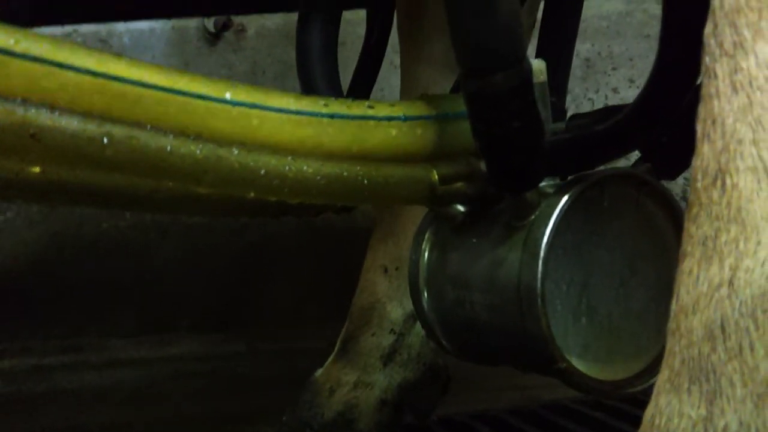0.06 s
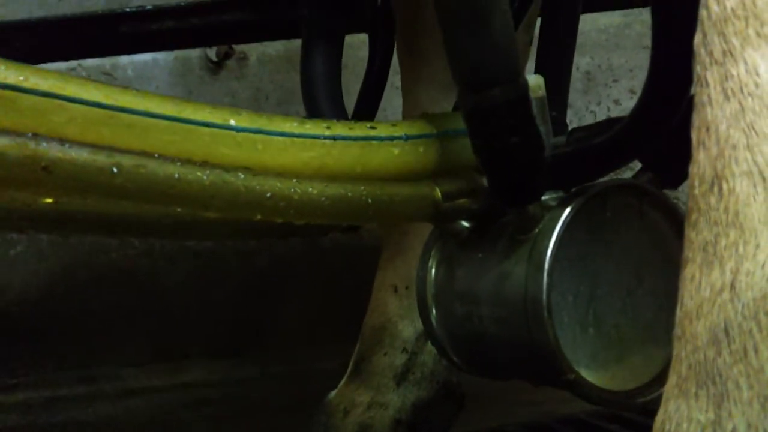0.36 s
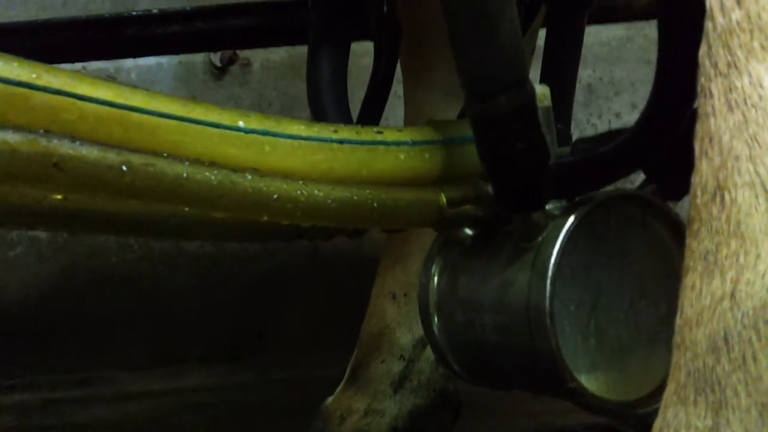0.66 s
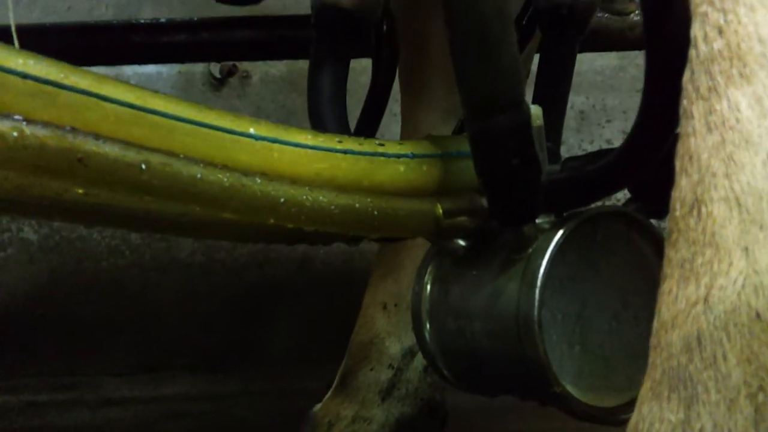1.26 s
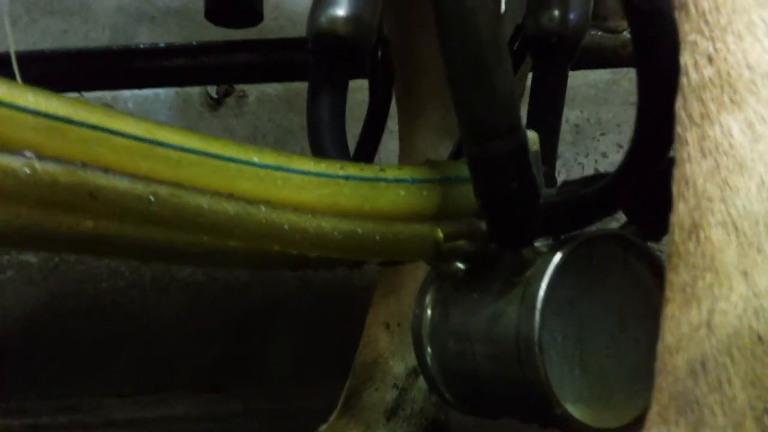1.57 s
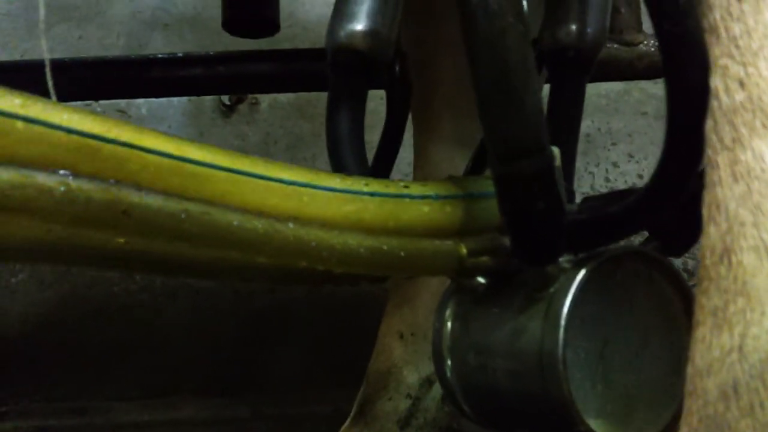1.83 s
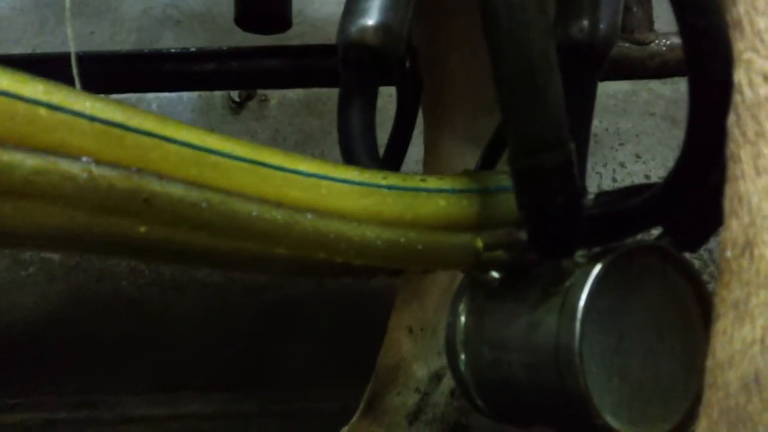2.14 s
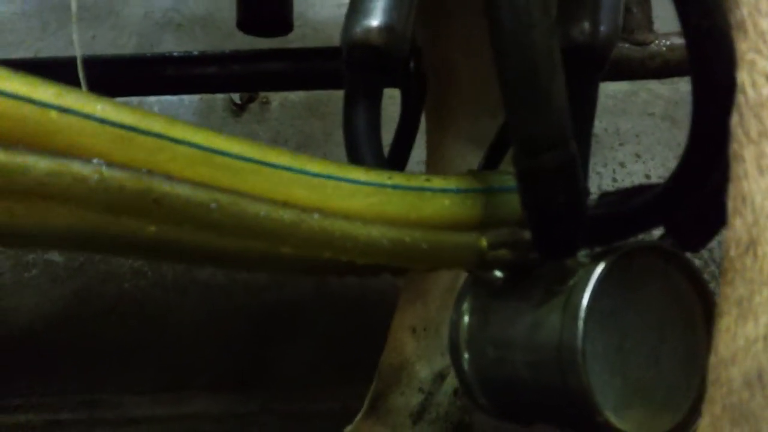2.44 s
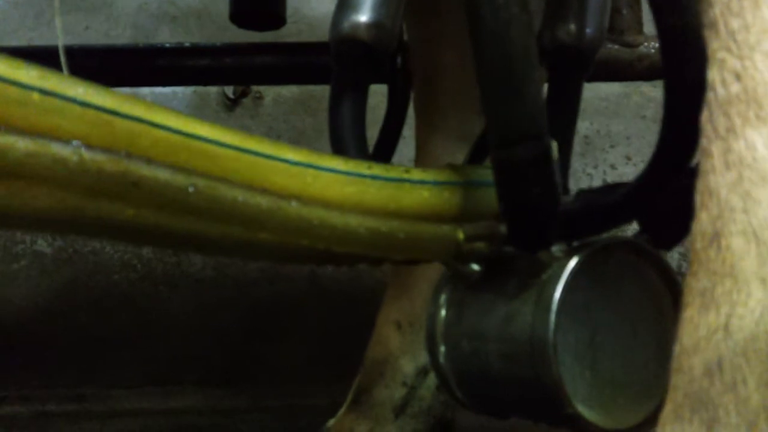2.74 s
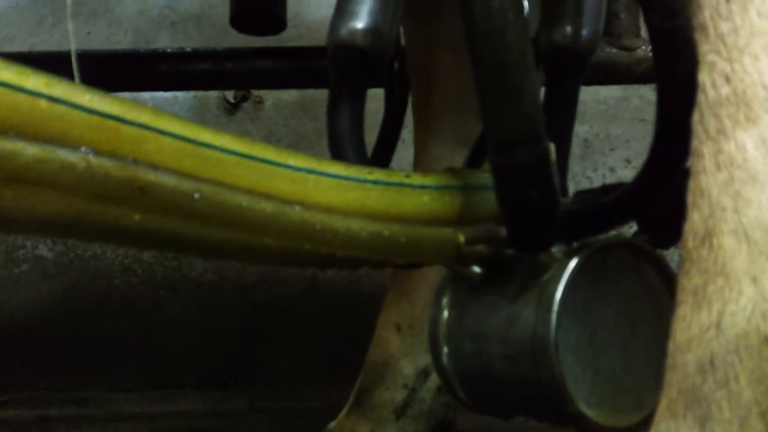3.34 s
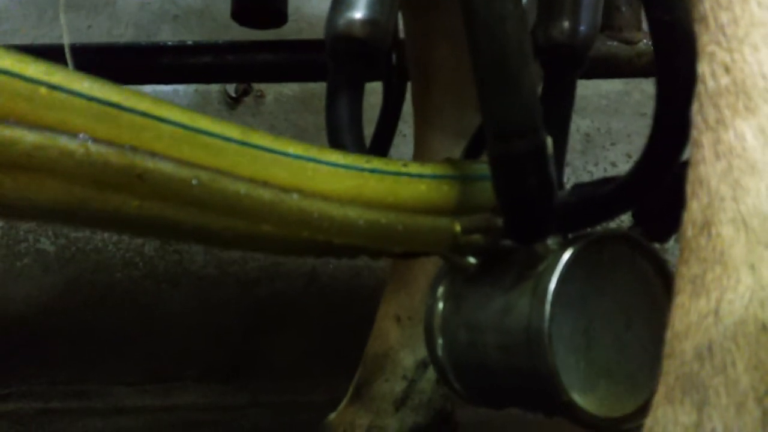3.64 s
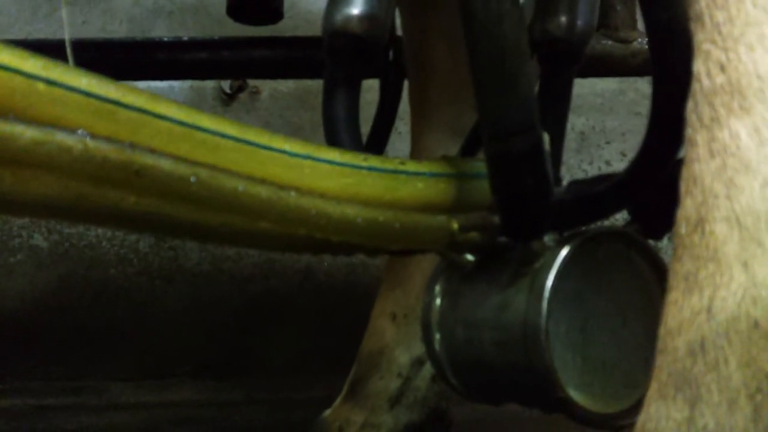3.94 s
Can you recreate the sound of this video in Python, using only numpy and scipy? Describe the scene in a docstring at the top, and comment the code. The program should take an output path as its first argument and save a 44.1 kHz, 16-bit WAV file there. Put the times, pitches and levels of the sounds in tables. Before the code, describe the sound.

A milking machine hisses unevenly and puffs twice a second over a low rumble.

```python
"""Milking a cow, up close

Air and milk hiss through the claw, the steel piece that joins the teat cups, in uneven
surges that set it and its milk tube ringing. The pulsator, an air valve, puffs about twice
a second and the hoses throb after it. Milk gurgles in the lines now and then, while the
vacuum pump drones over the steady rumble of the milking parlour."""
import sys
import numpy as np
from scipy import signal
from scipy.fft import irfft
from scipy.io import wavfile

SR = 44100
rng = np.random.default_rng(int(sys.argv[2]) if len(sys.argv) > 2 else 0)


def digitize_waveform(pressure):
    """Quantize a signal to 16-bit integers and store it at the path in sys.argv[1].

    Rows of a 2-D input are taken as channels; values are limited to [-1, 1].
    """
    field = np.atleast_2d(pressure).T
    bounded = np.clip(field, -1, 1)
    quanta = np.round(bounded * 32767).astype(np.int16)
    wavfile.write(sys.argv[1], SR, quanta)


N = 176400  # 4 seconds

# Flow through the claw. Each row: time in seconds, relative level in dB.
CLAW_FLOW = [(0.0, -31), (0.23, -34.5), (0.39, -29.5), (0.53, -34), (0.69, -28.5), (0.98, -29),
             (1.11, -26.5), (1.25, -30), (1.32, -25.5), (1.35, -29), (1.39, -23), (1.46, -27.5),
             (1.56, -28), (1.58, -20.5), (1.67, -27.5), (1.76, -28), (1.8, -23), (1.85, -27.5), (1.97, -24),
             (2.32, -29), (2.39, -19.5), (2.62, -26.5), (2.65, -22.5), (2.92, -25.5), (2.97, -24),
             (3.1, -27.5), (3.16, -25.5), (3.23, -27), (3.24, -25), (3.45, -22.5), (3.46, -22),
             (3.63, -24.5), (3.7, -21), (3.88, -28.5), (4.0, -24)]
# Tone of its high hiss. Each row: frequency in Hz, relative level in dB.
HISS_TONE = [(1000, -44.5), (2500, -14), (3500, -9), (4400, -3.5), (5250, 0), (6100, -3.5), (7000, -10),
             (7700, -13.5), (8300, -23), (9000, -47.5)]
# A lower rush under the hiss. Each row: time in seconds, relative level in dB.
RUSH_LEVELS = [(0.0, -36.5), (0.12, -38), (0.39, -32), (0.58, -36), (0.91, -30), (1.1, -34), (1.4, -29),
               (1.94, -28.5), (2.33, -29.5), (2.44, -28.5), (2.57, -30.5), (3.72, -29), (3.89, -32),
               (4.0, -33)]
# Tone of that rush. Each row: frequency in Hz, relative level in dB.
RUSH_TONE = [(300, -1.5), (700, -8), (1200, -6), (1600, 0.5), (1950, -1.5), (2250, 0), (2550, -2),
             (3200, 1.5), (4500, -4.5), (8000, -25)]
# Ringing notes of the claw and its milk tube. Each row: pitch in Hz, relative level in dB.
CLAW_NOTES = [(1572, -49), (2439, -44), (2498, -49), (2724, -46), (3031, -48), (3354, -46), (3537, -49),
              (3957, -42), (4323, -40), (4436, -42), (4527, -44), (4710, -42), (4791, -39), (4840, -37),
              (5044, -38), (5254, -34), (5292, -37), (5609, -37), (5696, -38), (6083, -43), (6573, -41),
              (6745, -50)]
TUBE_NOTES = [(1630, -14), (2235, -11), (3550, -6), (4315, -3), (4436, -6), (4700, -6), (4835, -4),
              (5265, -4), (5610, 0), (6085, -4), (6573, -9), (7085, -9), (7600, -12), (7870, -16),
              (8130, -19), (8400, -23)]
# Surges of air. Each row: start and hold in seconds, claw and tube ringing levels in dB.
AIR_SURGES = [(1.538, 0.021, -32.5, -32.5), (2.355, 0.074, -26.5, -32), (2.619, 0.027, -21, -34),
              (2.794, 0.025, -41, -47.5), (3.43, 0.17, -42, -33.5)]
# Pulsator strokes. Each row: start in seconds, then puff, hose and throb levels in dB.
PULSATOR_STROKES = [(-.12, -45, -32.5, -35), (0.338, -42, -34.5, -35.5), (0.851, -33.5, -33.5, -33),
                    (1.365, -39, -34, -38.5), (1.884, -33, -35.5, -32.5), (2.42, -36.5, -34, -36),
                    (2.919, -36, -32, -33.5), (3.45, -38.5, -33, -36), (3.945, -34.5, -35, -44)]
# Tones of a stroke's three parts. Each row: frequency in Hz, relative level in dB.
PUFF_TONE = [(300, -23), (600, -2), (900, -5), (1150, 1), (1350, -6.5), (1620, 0), (1950, 2.5), (2300, -10),
             (3200, -2.5), (8000, -24.5)]
HOSE_TONE = [(200, -25), (310, -12.5), (395, 2), (455, -1), (510, -8), (700, -27.5), (1500, -53)]
THROB_TONE = [(60, -37.5), (100, -6.5), (128, 9.5), (155, -2.5), (200, -35.5), (500, -50)]
# Notes of the pipe that takes the puff. Each row: pitch in Hz, relative level in dB.
PIPE_NOTES = [(813, -7), (1140, -7), (1560, -4), (1630, -1), (1850, -5), (2230, -4), (3110, -8)]
# The pump's drone. Each row: pitch as a multiple of the shaft speed, level in dB.
PUMP_NOTES = [(2, -55.5), (4, -54), (6, -53), (8, -41), (15, -49.5), (18, -49), (21, -54.5), (22, -55),
              (24, -54.5), (25, -52), (26, -52), (28, -55), (31, -58), (32, -55), (36, -52), (38, -53.5),
              (40, -54.5), (42, -54.5)]
# The motor's hum. Each row: time in seconds, level in dB.
MOTOR_LEVELS = [(0, -42), (.7, -43), (.85, -45), (1.15, -51), (1.65, -43.5), (2.05, -42), (2.45, -48),
                (2.9, -43), (3.3, -41), (3.75, -50), (4, -48)]
# The parlour's rumble. Each row: frequency in Hz, relative level in dB.
RUMBLE_TONE = [(15, -15), (35, -18.5), (48, -11), (68, -14), (85, -10.5), (98, 0.5), (130, 3.5), (178, -6),
               (260, -6.5), (350, -5.5), (480, -12.5), (620, -14.5), (1000, -16), (2500, -21),
               (8000, -47.5)]
# Gurgles in the lines. Each row: start and hold in seconds, pitch and spread in Hz, level in dB.
MILK_GURGLES = [(0.224, .03, 237, 35, -36), (1.773, 0.088, 1530, 110, -40), (2.245, 0.39, 1613, 111, -39.5),
                (3.205, 0.089, 953, 79, -42), (3.885, .06, 245, 34.5, -37)]

HISS_GAIN_DB, RUSH_GAIN_DB = -0.58, -3.3
CLAW_RING_DB, TUBE_RING_DB = -14.5, -11  # relative to the flow
SHAFT_HZ, MOTOR_HZ = 12.82, 57.7
RUMBLE_DB = -35.5
TREBLE_LIMIT_HZ, OFFSET = 8900, -.0879


def amp(db):
    """Turns decibels into a number to multiply by."""
    return 10 ** (np.asarray(db) / 20)


def unit(x):
    """Scales a signal to an average strength (rms) of 1."""
    return x / np.sqrt(np.mean(x ** 2) + 1e-20)


def curve(rows):
    """Joins (seconds, value) rows with straight lines."""
    return np.interp(np.arange(N) / SR, *np.transpose(rows))


def shaped_noise(gain):
    """Noise of strength 1, with each frequency weighted by gain(Hz)."""
    hz = np.fft.rfftfreq(N, 1 / SR)
    real, imag = rng.standard_normal((2, len(hz)))
    return unit(irfft((real + 1j * imag) * gain(hz), N))


def noise(tone):
    """Noise that follows a tone table."""
    hz, db = np.transpose(tone)
    return shaped_noise(lambda f: amp(np.interp(np.log(f + 1), np.log(hz), db)))


def noisy_note(hz, spread_hz):
    """Noise around one pitch, half as strong spread_hz to either side."""
    return shaped_noise(lambda f: 1 / (1 + ((f - hz) / spread_hz) ** 2))


def wander(lo_hz, hi_hz):
    """A random wobble, mostly between two rates."""
    return shaped_noise(lambda f: (f / lo_hz) ** 2 / (1 + (f / lo_hz) ** 2) / (1 + (f / hi_hz) ** 4))


def swell(start, rise_s, hold_s, fade_db_per_s):
    """A level that rises, holds and dies away."""
    t = np.arange(N) / SR - start
    return np.clip(t / rise_s, 0, 1) * amp(-fade_db_per_s * np.maximum(t - rise_s - hold_s, 0))


def ringing(notes, spread_hz, waver_db=2):
    """Narrow, noisy notes, each growing and fading on its own."""
    return unit(sum(amp(db + waver_db * wander(1.0, 6.5)) * noisy_note(hz, spread_hz)
                    for hz, db in notes))


def claw():
    """Air and milk hiss through the claw; the flow and its surges ring the steel and the tube."""
    flow = amp(curve(CLAW_FLOW))
    flicker_db = 0.4 * wander(8.6, 32) + 0.1 * wander(40, 260)
    hiss = flow * amp(HISS_GAIN_DB) * noise(HISS_TONE)
    rush = amp(curve(RUSH_LEVELS) + RUSH_GAIN_DB) * noise(RUSH_TONE)
    steel_level, tube_level = flow * amp(CLAW_RING_DB), flow * amp(TUBE_RING_DB)
    for start, hold, claw_db, tube_db in AIR_SURGES:
        surge = swell(start, rise_s=0.033, hold_s=hold, fade_db_per_s=94)
        steel_level += amp(claw_db) * surge
        tube_level += amp(tube_db) * surge
    steel = steel_level * ringing(CLAW_NOTES, spread_hz=13)
    tube = tube_level * ringing(TUBE_NOTES, spread_hz=8.4)
    return (hiss + rush) * amp(flicker_db) + steel + tube


def pulsator():
    """Each stroke lets a puff of air into a pipe; the hoses sound hollow and then throb."""
    puff, hose, throb = np.zeros((3, N))
    for start, puff_db, hose_db, throb_db in PULSATOR_STROKES:
        puff += amp(puff_db) * swell(start + .002, rise_s=.03, hold_s=.04, fade_db_per_s=110)
        hose += amp(hose_db) * swell(start + .004, rise_s=.028, hold_s=.085, fade_db_per_s=75)
        throb += amp(throb_db) * swell(start + .03, rise_s=.045, hold_s=.08, fade_db_per_s=80)
    air = noise(PUFF_TONE) + amp(-3) * ringing(PIPE_NOTES, spread_hz=30)
    return puff * air + hose * noise(HOSE_TONE) + throb * noise(THROB_TONE)


def hum(hz, db, waver_db, drift_radians):
    """One pure note that wavers in level and drifts slightly in pitch."""
    phase = 2 * np.pi * (hz * np.arange(N) / SR + rng.random())
    phase += drift_radians * wander(0.27, 5.0)
    return np.sqrt(2) * amp(db + waver_db * wander(0.46, 2.2)) * np.sin(phase)


def vacuum_pump():
    """The pump drones at multiples of its shaft speed while its motor hums."""
    drone = sum(hum(SHAFT_HZ * multiple, db, waver_db=3.0, drift_radians=0.4)
                for multiple, db in PUMP_NOTES)
    return drone + hum(MOTOR_HZ, curve(MOTOR_LEVELS), waver_db=-1.0, drift_radians=0.35)


def parlour_rumble():
    """The low, steady noise of the room."""
    return amp(RUMBLE_DB) * noise(RUMBLE_TONE)


def gurgles():
    """Each slug of milk stirs one hollow note in the lines."""
    sound = np.zeros(N)
    for start, hold, hz, spread_hz, db in MILK_GURGLES:
        level = amp(db) * swell(start, rise_s=0.015, hold_s=hold, fade_db_per_s=161)
        sound += level * noisy_note(hz, spread_hz)
    return sound


def scene():
    """Adds all the sounds into one channel."""
    return (claw() + pulsator() + vacuum_pump() + parlour_rumble() + gurgles())[None]


def record(dry):
    """Cuts the highest treble and shifts the whole wave by a constant, silent offset."""
    low_pass = signal.firwin(401, TREBLE_LIMIT_HZ, window=("kaiser", 9), fs=SR)
    return signal.oaconvolve(dry, low_pass[None], "same", axes=1) + OFFSET


dry = scene()
out = record(dry)
digitize_waveform(out)
```